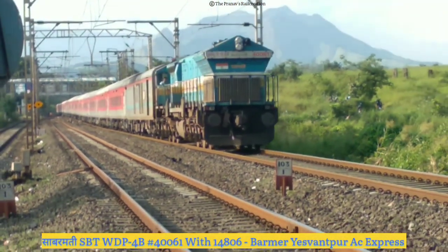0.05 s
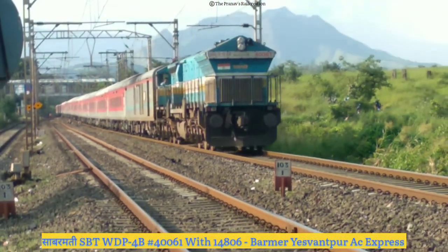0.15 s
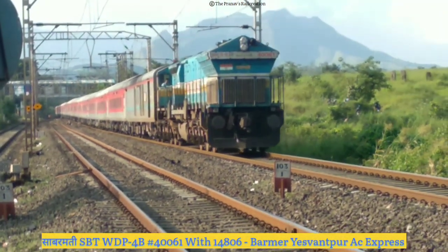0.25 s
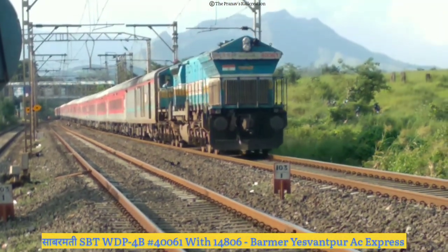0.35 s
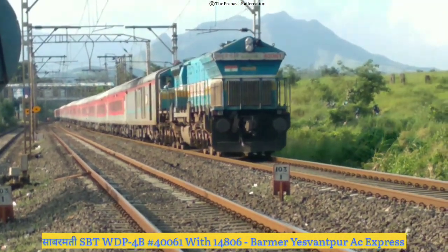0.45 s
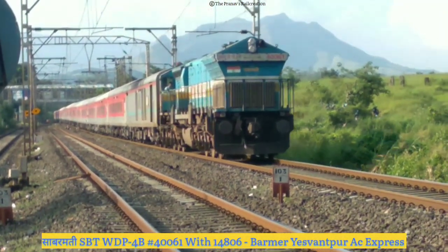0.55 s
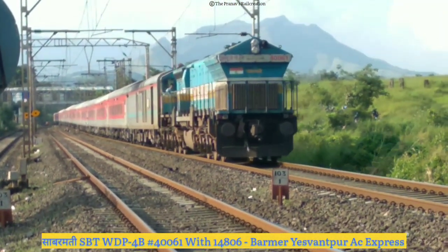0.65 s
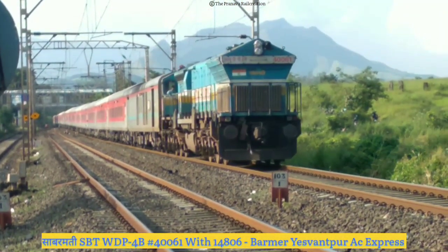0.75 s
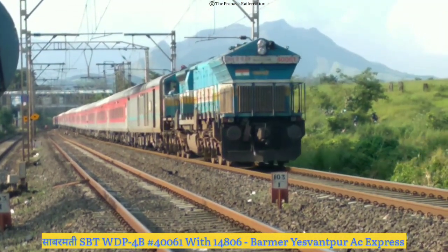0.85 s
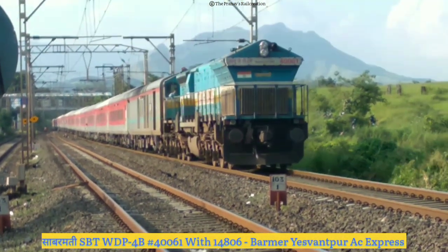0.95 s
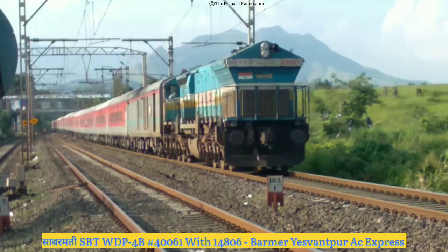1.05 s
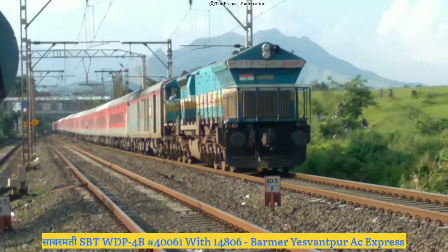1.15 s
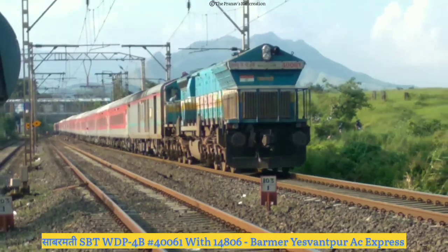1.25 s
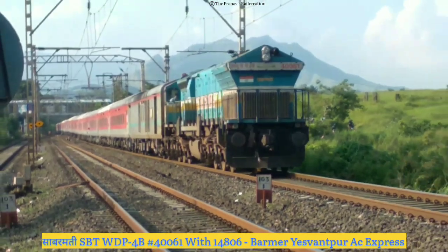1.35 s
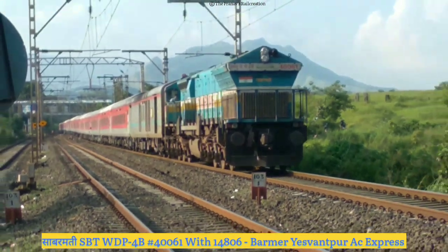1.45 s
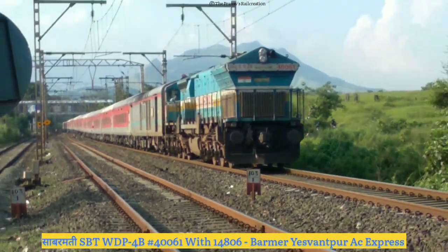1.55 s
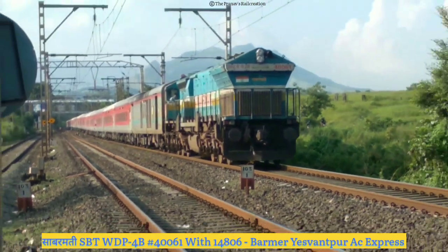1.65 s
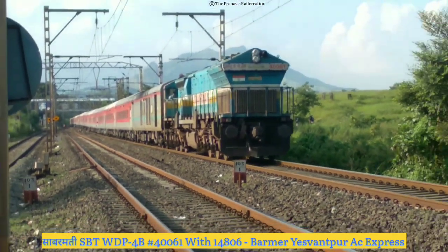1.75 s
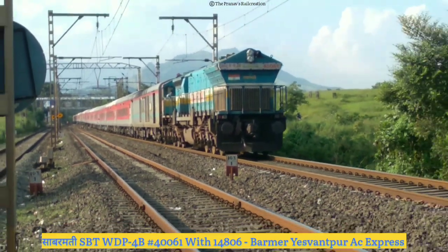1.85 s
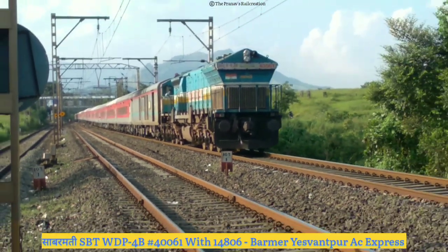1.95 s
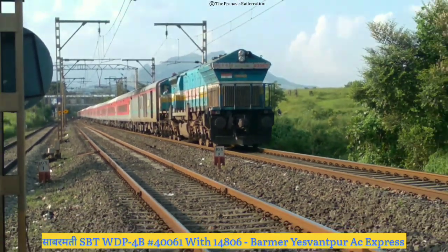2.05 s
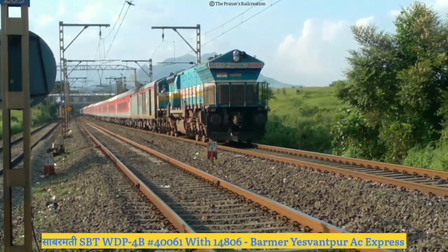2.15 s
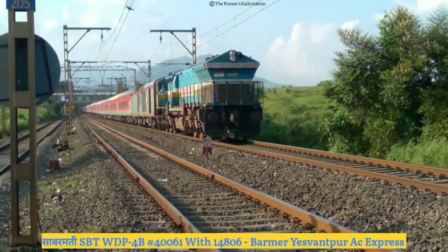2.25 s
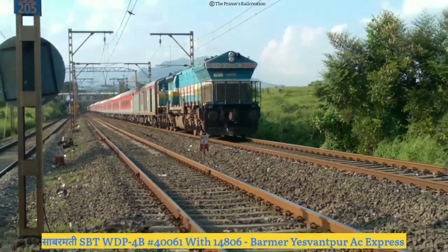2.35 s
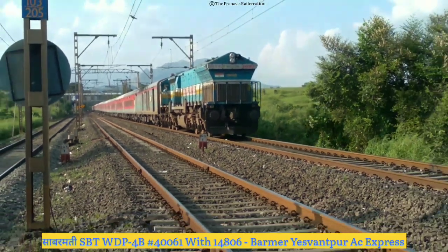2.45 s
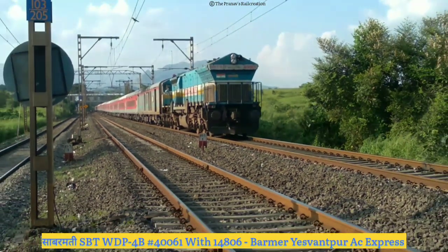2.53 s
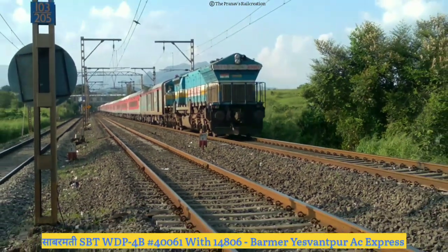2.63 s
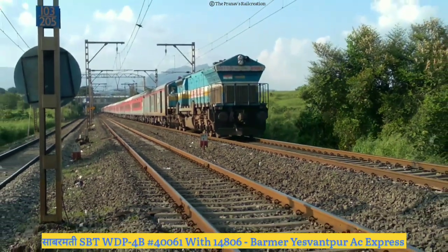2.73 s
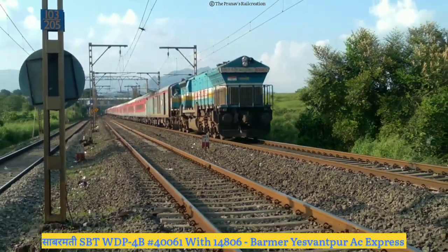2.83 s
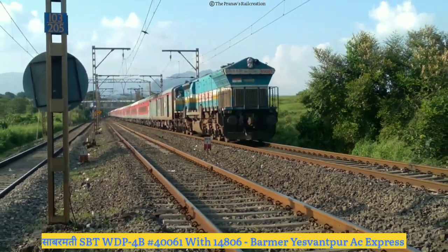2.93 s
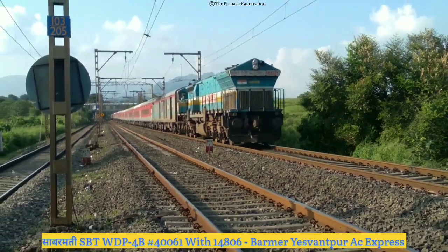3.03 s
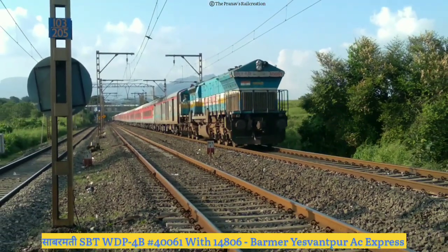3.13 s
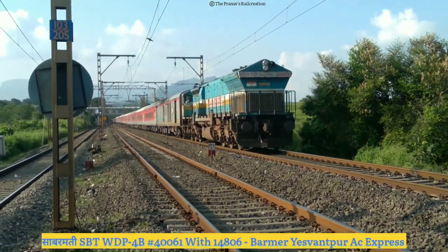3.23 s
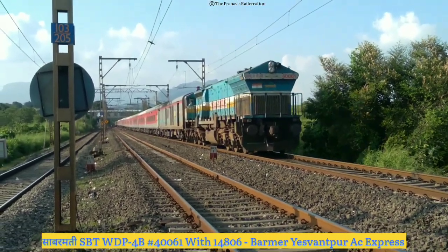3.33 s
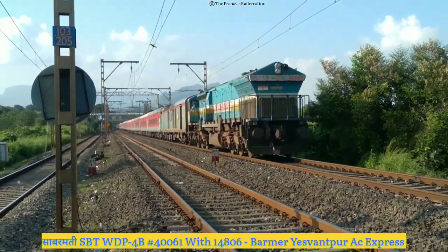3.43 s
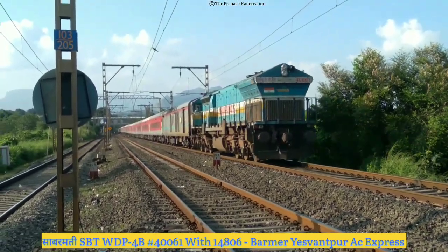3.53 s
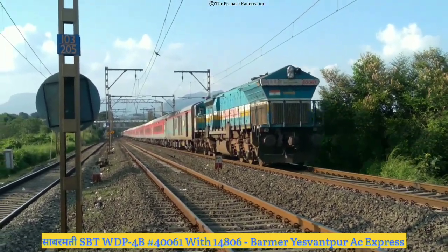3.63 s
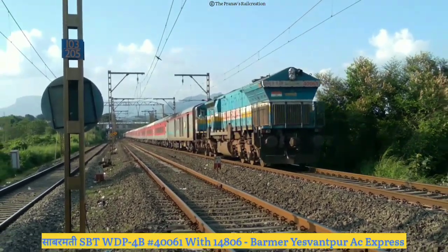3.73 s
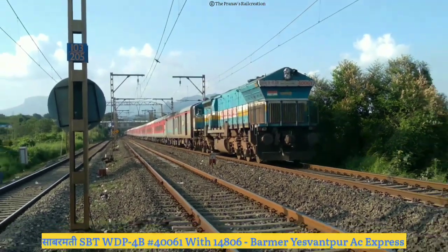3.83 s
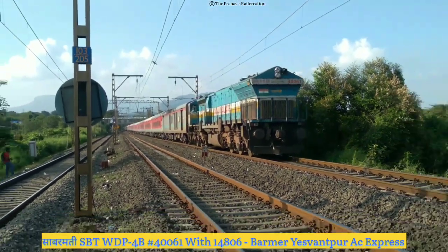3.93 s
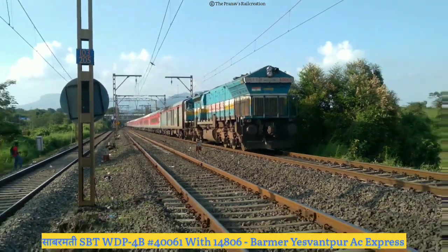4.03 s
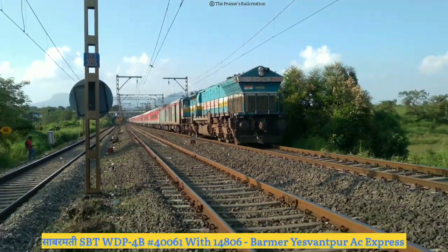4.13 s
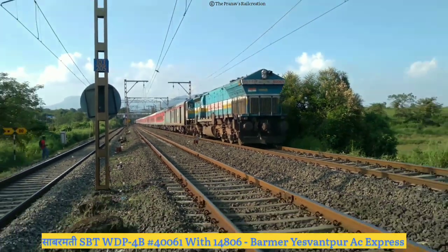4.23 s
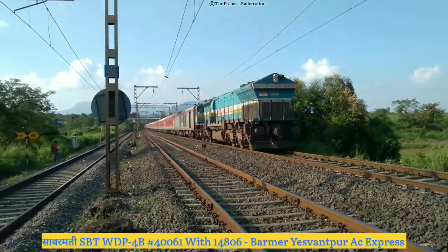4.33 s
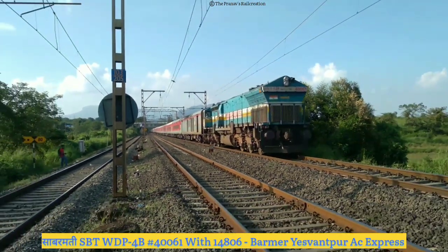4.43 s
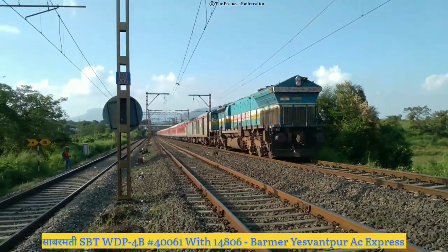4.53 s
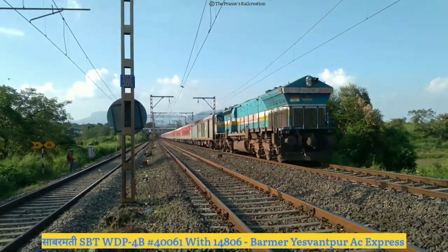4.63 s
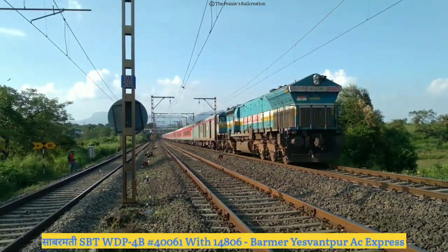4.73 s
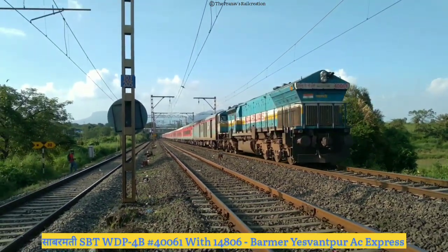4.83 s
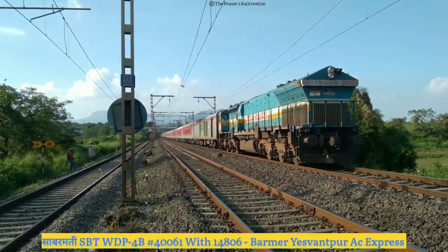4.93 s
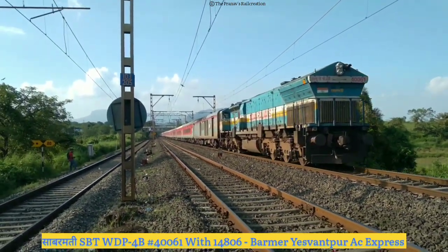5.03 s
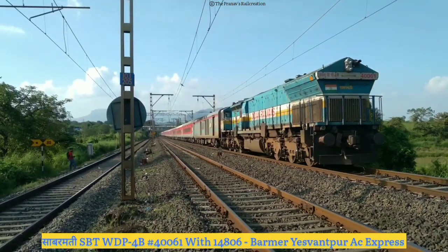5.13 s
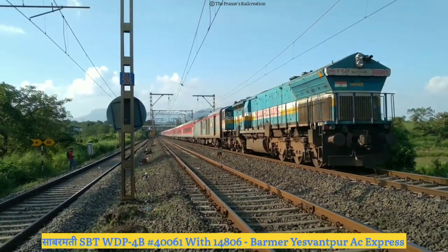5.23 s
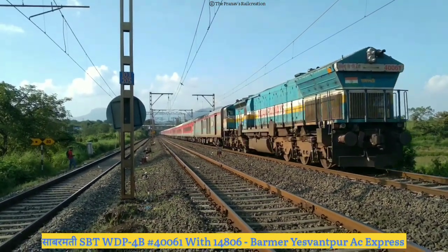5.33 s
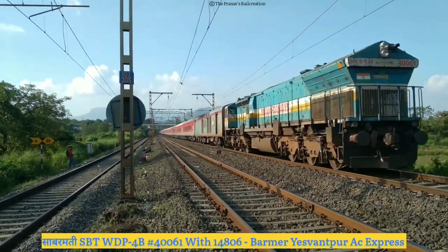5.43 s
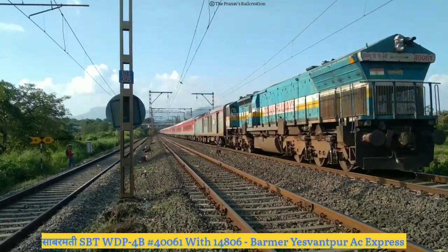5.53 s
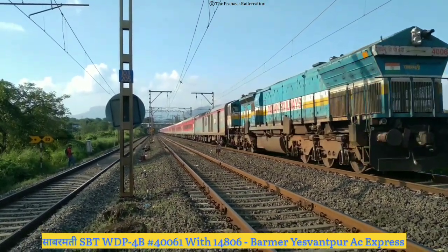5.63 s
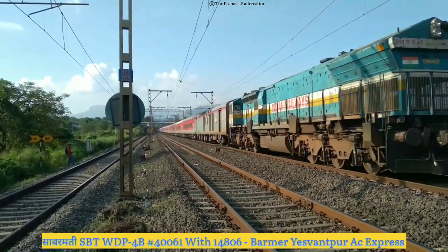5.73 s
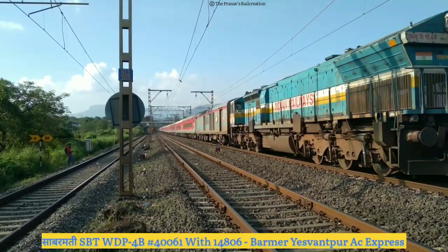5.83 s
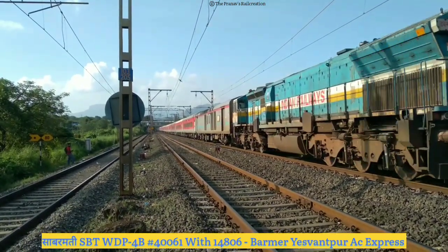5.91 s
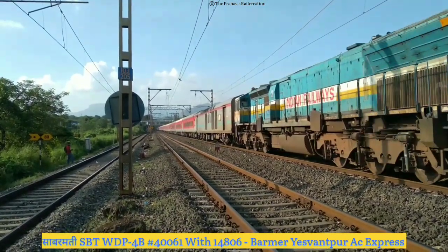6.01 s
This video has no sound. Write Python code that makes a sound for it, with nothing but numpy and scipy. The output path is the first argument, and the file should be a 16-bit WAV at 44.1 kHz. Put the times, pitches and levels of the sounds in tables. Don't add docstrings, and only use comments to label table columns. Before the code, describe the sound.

A train nears an exposed trackside microphone. The first three seconds are fairly quiet: low engine drone, airy roar and thin wavering whines, after one small puff of wind. Then wind bursts in with dull flaps and crackling overload, mostly on the right, while the diesel revs up, deep and pulsating. Its whistling turbocharger rises and leans left, with short wheel hums and squeaks, and the roar is loudest at the end.

```python
import sys
import numpy as np
from scipy import signal
from scipy.io import wavfile
from scipy.ndimage import uniform_filter1d, map_coordinates

SR = 44100
rng = np.random.default_rng(int(sys.argv[2]) if len(sys.argv) > 2 else 0)


def elevation(decibels):
    levels = np.asarray(decibels, float)
    return 10 ** (levels / 20)


def store_wav(level_fs):
    pcm = np.round(np.clip(np.atleast_2d(level_fs), -1, 1) * 32767)
    wavfile.write(sys.argv[1], SR, pcm.T.astype(np.int16))


N = 267687
TIME = np.arange(N) / SR


def in_time(rows):
    s, *columns = np.transpose(rows)
    return [np.interp(TIME, s, c) for c in columns]


def at_hz(points, hz):
    at, *columns = np.transpose(points)
    return np.squeeze([np.interp(np.log(hz), np.log(at), c) for c in columns])


def rms_one(x):
    return x / np.sqrt(np.mean(x ** 2) + 1e-20)


def band(x, low_hz, high_hz, order):
    return signal.sosfilt(signal.butter(order, [low_hz, high_hz], "band", fs=SR, output="sos"), x)


def drift(rate):
    r = np.exp(-80 * np.pi * rate / SR)
    slow = signal.lfilter([1], [1, -2 * r, r * r], rng.standard_normal(N // 40 + 2002))[2000:]
    return np.interp(np.arange(N) / 40, np.arange(len(slow)), rms_one(slow))


def tone(hz, db, wander_hz, flicker_db, rate):
    phase = 2 * np.pi * (np.cumsum(hz + wander_hz * drift(rate)) / SR + rng.random())
    return np.sqrt(2) * elevation(db + flicker_db * drift(rate)) * np.sin(phase)


# time in seconds, rate in Hz.
CYCLE = [(0, 4.93), (1, 5.04), (2, 5.08), (3.5, 5.0), (3.75, 5.27), (4, 5.58), (4.25, 5.72), (4.5, 6.08),
         (4.75, 6.42), (5, 6.7), (5.25, 6.86), (5.5, 7.0), (5.75, 6.92), (6.07, 6.72)]
# time in seconds, level in dB.
BEAT_LEVEL = [(0, -43.5), (.5, -32.5), (1.5, -29), (3.25, -31), (3.75, -21.5), (4, -16.5), (4.35, -17.5),
              (4.65, -15.5), (5.0, -15), (5.25, -15.5), (5.5, -16.5), (5.75, -18.5), (6.07, -17)]
# multiple of the cycle rate, level against the main beat in dB.
WEAK_ORDERS = [(10, -37.5), (11, -15), (12, -26)]
# multiple of the cycle rate, level against
# the main beat in dB.
PIPE_ORDERS = [(13, 2.5), (15, -2.5), (17, -3), (19, -10.5)]


def exhaust():
    pipe_hz, pipe_width_hz, pipe_skirt_db = 86.6, 17.5, 20.5
    idle_cycle_hz = 5.0
    pipe_climb = 5.44
    (cycle,), (main_db,) = in_time(CYCLE), in_time(BEAT_LEVEL)
    resonance_hz = pipe_hz + pipe_climb * (cycle - idle_cycle_hz)
    orders = [(8, main_db)]
    orders += [(k, main_db + db) for k, db in WEAK_ORDERS]
    for k, db in PIPE_ORDERS:
        off_tune = 2 * (k * cycle - resonance_hz) / pipe_width_hz
        orders.append((k, main_db + db - pipe_skirt_db * np.log10(1 + off_tune ** 2)))
    crank = 2 * np.pi * np.cumsum(cycle) / SR
    beats = np.zeros(N)
    for k, db in orders:
        level = np.sqrt(2) * elevation(db + 0.9 * drift(5.0))
        beats += level * np.cos(k * crank + 0.25 * drift(1.1))
    return beats


# time in seconds, pitch in Hz, level in dB.
FAN = [(0, 151.2, -45.5), (2.8, 147.8, -42), (3.3, 150.5, -40.5), (4.0, 173.1, -39), (4.3, 176, -32.5),
       (5.0, 183.3, -40), (6.07, 181.7, -38.5)]


def fan():
    return tone(*in_time(FAN), wander_hz=0.29, flicker_db=3.7, rate=6.0)


# time in seconds, roar level in dB, nearness 0-1, left port's lag in samples.
APPROACH = [(0, -41.5, 0.18, 0), (.5, -41.5, 0.2, 1.5), (1, -39, 0.14, 3.5), (1.5, -37.5, 0, 0.5),
            (2, -38.5, 0.24, 3), (2.5, -38, 0.36, 4), (3, -37.5, 0.32, 1.9), (3.5, -35, 0.4, 2.5),
            (4, -34, 0.76, -3.5), (4.5, -31, 0.6, -2), (5, -28.5, 0.54, -2.5), (5.5, -26.5, 0.74, -3),
            (6.07, -25, 0.7, -3.5)]
# frequency in Hz, density in dB per Hz.
FAR = [(60, -4.5), (180, -19.5), (350, -17), (560, -25.5), (720, -9.5), (880, -20), (1040, -30.5),
       (1250, -19), (1550, -25), (1720, -31), (2250, -25), (2750, -35.5), (4400, -40), (7200, -52)]
# frequency in Hz, density in dB per Hz.
NEAR = [(60, 5), (200, -7), (400, -19.5), (580, -14.5), (740, -13), (900, -24.5), (1050, -28), (1360, -26),
        (1700, -32), (2200, -29.5), (2750, -35.5), (3500, -33), (5000, -41.5), (7200, -51)]
# frequency in Hz, left gain in dB, right gain in dB.
PORTS = [(5000, 0, 0), (6000, 4, -4), (7200, 3, -3), (8400, -9, -5), (9500, -14, 3), (10100, -17, 2),
         (11000, -20, -9), (12000, -23, -15), (13000, -26, -22), (15500, -31, -28)]
# frequency in Hz, left-right likeness 0-1.
LIKENESS = [(60, 1), (120, 0.13), (230, 1), (450, 0.74), (890, 0.73), (1740, 0.78), (3420, 0.46),
            (6710, 0.11)]


def roar():
    hz, s, (mid, side) = signal.stft(rng.standard_normal((2, N)), SR, nperseg=1024)
    hz = np.maximum(hz, 30)
    far, near = at_hz(FAR, hz)[:, None], at_hz(NEAR, hz)[:, None]
    alike = np.clip(at_hz(LIKENESS, hz)[:, None], 0, 1)
    ports_db = at_hz(PORTS, hz)[:, :, None]
    hz = hz[:, None]
    moments = np.minimum((s * SR).astype(int), N - 1)
    db, nearness, lag = (c[moments] for c in in_time(APPROACH))
    colour = far * (1 - nearness) + near * nearness
    colour = colour - 10 * np.log10(np.mean(elevation(colour) ** 2 * (hz > 400) * (hz < 7000), axis=0))
    coarse = uniform_filter1d(rng.standard_normal((24, len(s))), size=5, axis=1)
    coarse = coarse + 0.22 * rng.standard_normal(len(s))
    rows = np.clip(3 * np.log2(hz / 60), 0, 23) + 0 * s
    patches = map_coordinates(coarse, [rows, np.arange(len(s)) + 0 * hz], order=1)
    shared, apart = np.sqrt(1 + alike) * mid, np.sqrt(1 - alike) * side
    left = (shared + apart) * np.exp(-2j * np.pi * hz * lag / SR)
    right = shared - apart
    heard = np.array([left, right]) * elevation(db + colour + 1.56 * patches + ports_db)
    return signal.istft(heard / np.sqrt(2), SR, nperseg=1024)[1][:, :N]


# level at the mean roar in dB, dB gained per dB of roar.
WHINE_LAW = [
    (-62.5, 1.3),
    (-60.5, 1.47),
    (-66, 1.2),
]


def whine_level(law, swells):
    db, follows = law
    roar_db = in_time(APPROACH)[0]
    level = db + follows * (roar_db - roar_db.mean())
    for s, length, up in swells:
        level = level + up * np.exp(-((TIME - s) / length) ** 2)
    return level


# time in seconds, pitch in Hz.
TURBINE = [(0, 3006), (.5, 2900), (1, 2865), (2, 2895), (3, 2840), (3.5, 2860), (3.8, 3000), (4.4, 3404),
           (4.7, 3590), (4.8, 3700), (5, 3790), (5.3, 3915), (5.5, 3935), (5.85, 3860), (6.07, 3800)]
# centre in seconds, length in seconds, gain in dB.
TURBINE_SWELLS = [(.08, 0.37, 9.5), (.9, 0.092, 8), (1.223, 0.09, 7), (1.504, 0.15, 4.5), (2.843, 0.11, 3),
                  (3.215, 0.099, 6), (3.878, 0.18, 9.5), (4.2, .1, -13), (4.982, 0.16, 10), (5.6, 0.11, 6),
                  (5.875, 0.17, 9.5)]


def turbine():
    (hz,), nearness = in_time(TURBINE), in_time(APPROACH)[1]
    level = whine_level(WHINE_LAW[0], TURBINE_SWELLS)
    whine = tone(hz + 14.0 * drift(2.5), level, wander_hz=9.5, flicker_db=3.5, rate=13.3)
    swing = np.array([[1], [-1]])
    return whine * elevation(swing * (3.9 * nearness - 4.0))


# time in seconds, pitch in Hz.
GEAR = [(0, 2520), (1, 2415), (3, 2420), (3.5, 2430), (4.1, 2650), (4.7, 3050), (5, 3235), (5.2, 3273),
        (6.07, 3273)]
# centre in seconds, length in seconds, gain in dB.
GEAR_SWELLS = [(.05, .15, 4), (.8, 0.19, -9), (1.5, .25, 7), (1.92, 0.078, 8), (2.7, 0.066, 8),
               (3.17, 0.093, 11), (4.45, 0.16, -4), (4.63, 0.043, 3), (4.72, 0.025, 5), (4.9, 0.076, 4.5),
               (5.12, 0.036, 8.5), (5.32, 0.12, 5), (5.6, 0.15, 7), (5.805, .075, -36)]


def gear():
    level = whine_level(WHINE_LAW[1], GEAR_SWELLS)
    whine = tone(in_time(GEAR)[0], level, wander_hz=12, flicker_db=3.5, rate=16.0)
    shaft = np.sin(2 * np.pi * np.cumsum(76 + 5.0 * drift(6.0)) / SR)
    return whine * (1 + 0.9 * shaft)


# centre in seconds, length in seconds, gain in dB.
COMPRESSOR_SWELLS = [
    (.1, 0.22, 9.5),
    (1.42, .3, 4.5),
    (3.35, .15, 2.5),
    (3.751, .1, 1),
    (4.5, 0.54, -3),
    (5.25, 0.1, 5),
    (5.9, 0.067, 1),
]


def compressor():
    (turbine_hz,), nearness = in_time(TURBINE), in_time(APPROACH)[1]
    level = whine_level(WHINE_LAW[2], COMPRESSOR_SWELLS)
    whine = tone(1.555 * turbine_hz, level + 1.4 * drift(6.0), wander_hz=29.97, flicker_db=4.0, rate=45.0)
    blade_hiss = tone(1.545 * turbine_hz, level + 3.0, wander_hz=233.3, flicker_db=-1.5, rate=130.0)
    swing = np.array([[1], [-1]])
    return (whine + blade_hiss) * elevation(3.5 + swing * 7.7 * nearness - 4.0)


# time in seconds, left level in dB, right level in dB.
WIND = [(0, -29, -46), (.37, -21.5, -16.5), (.7, -33, -38), (1.1, -76, -58), (2.2, -46, -50),
        (2.5, -22, -43), (2.75, -35, -27), (3.0, -11.5, -20.5), (3.3, -22.5, -15), (3.5, -10.5, -10.5),
        (3.8, -30, -4.5), (4.05, -10, -5), (4.22, -18, -24.5), (4.48, -13, -2.5), (4.72, -18.5, -26.5),
        (5.25, -13.5, -4), (5.55, -23, -9.5), (6.07, -30, -11.5)]


def buffeting(wind_db):
    low = band(rng.standard_normal((2, N)), 22.3, 117.4, order=3)
    return np.array([elevation(db - 6.0 + 3.5 * drift(9.5)) * rms_one(v) for db, v in zip(wind_db, low)])


def eddies(wind_db):
    gap, size, sharpness = rng.standard_normal((200, 3)).T
    s = (np.arange(len(gap)) + 0.35 * gap) / 26
    db = -12.5 + 1.25 * np.interp(s, TIME, wind_db) + 1.5 * size
    crackle_db = -13 + 5 * sharpness
    return [row for row in zip(s, db, crackle_db) if 0 < row[0] < TIME[-1]]


def gusts(rows):
    rise_s, fall_s, crackle_share = 0.0065, 0.013, 0.82
    flap, crackle = np.zeros(N), np.zeros(N)
    for s, db, crackle_db in rows:
        near = slice(max(round(s * SR) - 3000, 0), round(s * SR) + 3000)
        age = (TIME[near] - s) / np.where(TIME[near] < s, rise_s, fall_s)
        flap[near] += elevation(db) * np.exp(-.5 * age ** 2)
        crackle[near] += elevation(db + crackle_db - 8.0) * np.exp(-.5 * (age / crackle_share) ** 2)
    dull = band(rng.standard_normal(N), 111, 283, order=2)
    dull = dull / np.sqrt(uniform_filter1d(dull ** 2, size=500) + 1e-9)
    steps = (rng.random(N) < 700.0 / SR) * rng.standard_normal(N)
    sharp = band(steps, 387, 600, order=1)
    sharp = signal.sosfilt(signal.butter(3, 1400.0, fs=SR, output="sos"), sharp)
    sharp = sharp / np.sqrt(uniform_filter1d(sharp ** 2, size=900) + 1e-9)
    return 0.93 * flap * dull + crackle * sharp


# time in seconds, peak level in dB.
SNAPS = [
    (3.301, -21.5),
    (3.579, -26.5),
    (3.606, -12),
    (3.692, -8.5),
    (3.7834, 0),
    (3.897, -11),
    (3.977, -16),
    (4.183, -26),
    (4.52, -5.5),
    (5.788, -15),
]


def snaps():
    clicks = np.zeros(N)
    for s, db in SNAPS:
        clicks[round(s * SR)] = elevation(db + 17.5)
    rebound = band(clicks, 80, 430, order=1)
    return band(clicks, 200, 1500, order=2) + .0013 * clicks ** 2 - 0.27 * rebound


# time in seconds, level in dB, crackle against it in dB.
GUSTS_LEFT = [(.287, -51, -4), (3.009, -17, -25), (3.115, -32, -17), (3.351, -29, 1), (3.439, -19, -12),
              (3.522, -19, -10), (3.588, -32, -3), (3.778, -23.5, 5), (3.932, -30, -12),
              (3.999, -15.5, -13), (4.337, -18, -21), (4.982, -37.5, -8), (5.16, -11.5, 5.5),
              (5.226, -6.5, 0.5), (5.246, -15, 0), (5.314, -10, -20), (5.367, -20, 0), (5.6, -18.5, -12),
              (5.634, -18, -12), (5.717, -14, 3), (5.748, -12, -1), (5.912, -22, -19), (5.953, -21, -8),
              (6.0, -18.5, -10)]
# time in seconds, level in dB, crackle against it in dB.
GUSTS_RIGHT = [(.475, -40, -23), (2.955, -23.5, -18), (3.102, -16.5, -18), (3.19, -26.5, -22),
               (3.305, -18.5, -0.5), (3.397, -17, -19), (3.53, -11, -13), (3.579, -17.5, 1),
               (3.603, -13.5, 4.5), (3.686, -10, 4), (3.716, -13.5, 3.5), (3.734, -18, 5), (3.845, -22, -9),
               (3.874, -24, 9), (3.98, -12.5, -13), (4.02, -24, 10), (4.063, -22.5, 4),
               (4.109, -10.5, -2.5), (4.178, -13.5, -2.5), (4.331, -16.5, -22), (4.505, -10, -6),
               (5.166, -15.5, 1.5), (5.252, -12, -25), (5.316, -9.5, -22), (5.393, -10, -6),
               (5.448, -12, 2.5), (5.548, -22, -4), (5.747, -10.5, 5), (5.787, -16, 9.5), (5.985, -17, -22)]


def wind():
    left_db, right_db = in_time(WIND)
    rumble = buffeting([left_db, right_db])
    left = gusts(GUSTS_LEFT + eddies(left_db))
    right = gusts(GUSTS_RIGHT + eddies(right_db)) + snaps()
    return rumble + np.array([left, right])


# start in seconds, end in seconds, pitch in Hz,
# level in dB.
SQUEALS = [(.2, 3.0, 1151, -58), (2.903, 3.4, 6800, -80), (3.663, 3.85, 4650, -55), (3.66, 3.74, 5020, -63),
           (3.852, 3.92, 5240, -61), (4.0, 4.095, 5350, -63), (4.54, 4.627, 4100, -57),
           (4.45, 4.7, 685, -38), (4.74, 5.13, 515, -41), (4.894, 5.174, 731.5, -34), (5.5, 5.75, 725, -36),
           (5.91, 6.01, 3230, -44)]


def squeals():
    out = np.zeros(N)
    for start, end, hz, db in SQUEALS:
        gate = np.clip(np.minimum(TIME - start, end - TIME) / 0.0093, 0, 1)
        out += gate * tone(hz, db, wander_hz=.003 * hz, flicker_db=1.5, rate=20.0)
    return out


def scene():
    train = exhaust() + fan() + roar() + turbine() + gear() + compressor() + squeals()
    return train + wind()


def roll_off(x):
    return signal.sosfilt(signal.butter(12, 15750, fs=SR, output="sos"), x)


def record(dry):
    hissy = dry + elevation(-84) * rng.standard_normal(dry.shape)
    limited = hissy / (1 + np.abs(hissy / .97) ** 6) ** (1 / 6)
    return roll_off(limited)


dry = scene()
out = record(dry)
store_wav(out)
```